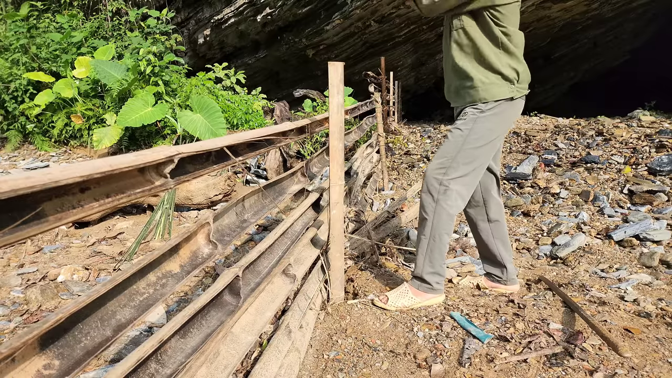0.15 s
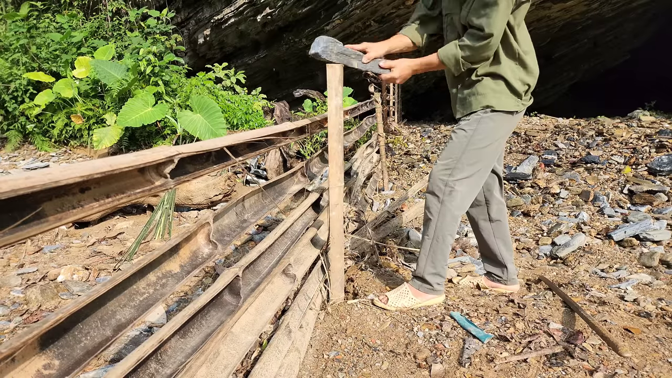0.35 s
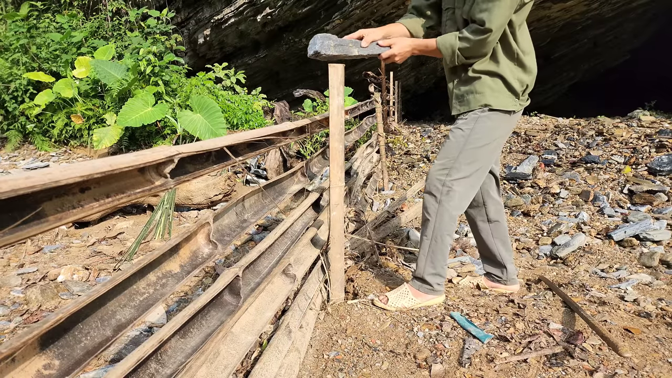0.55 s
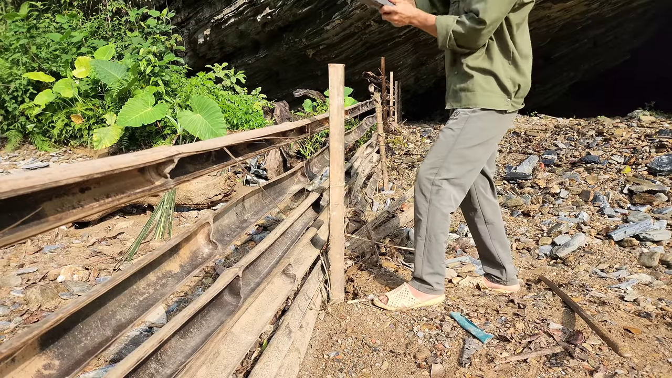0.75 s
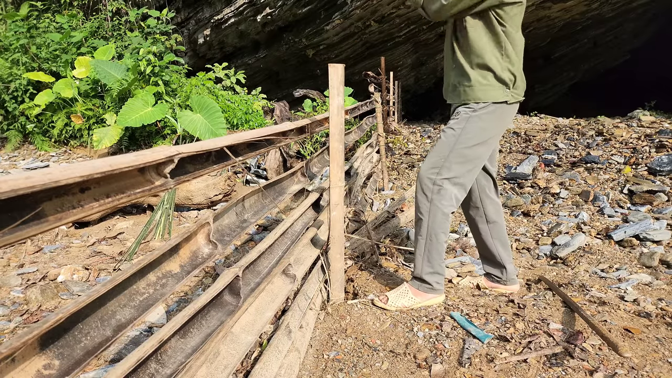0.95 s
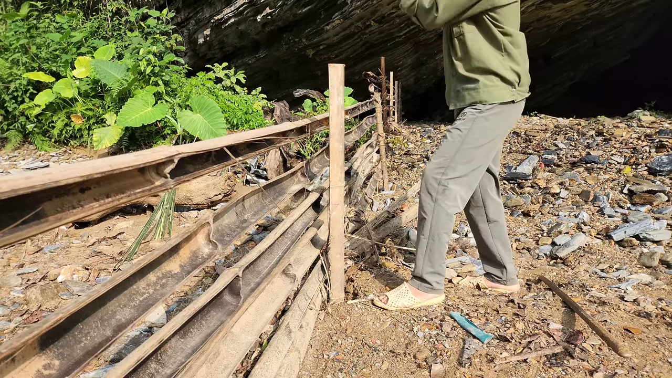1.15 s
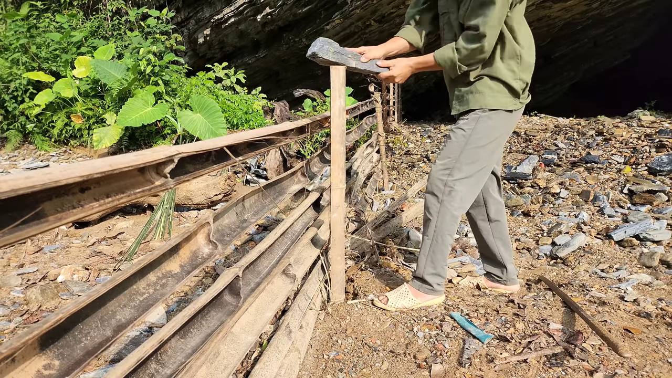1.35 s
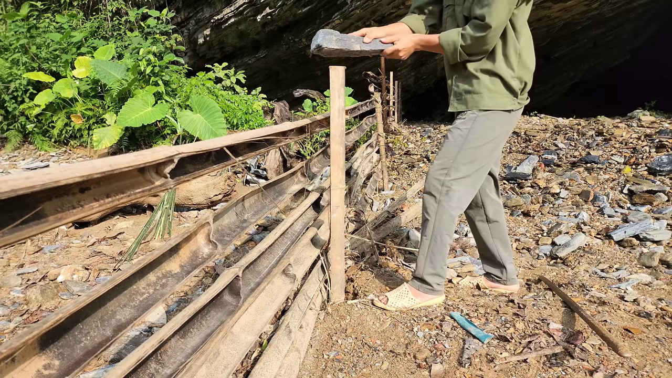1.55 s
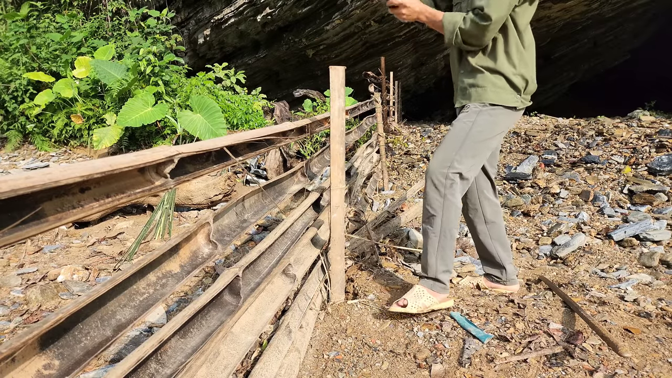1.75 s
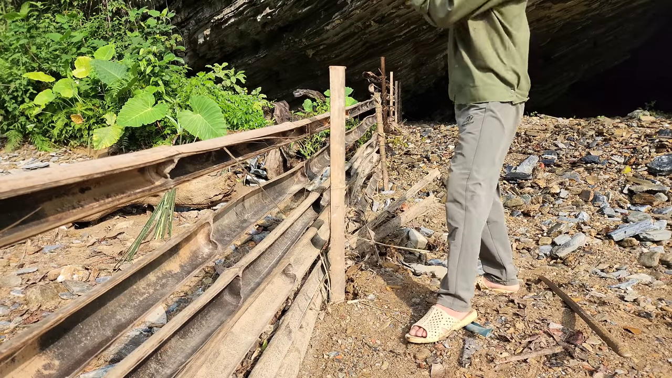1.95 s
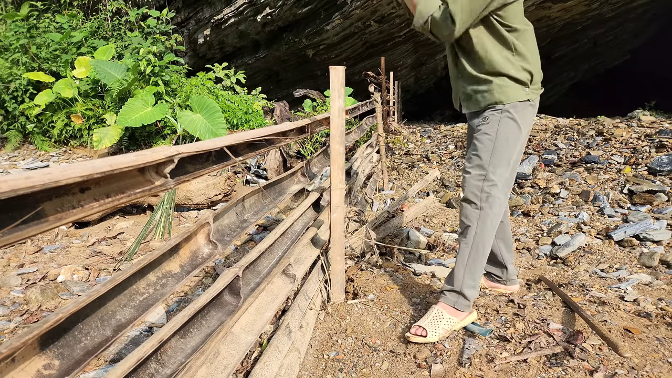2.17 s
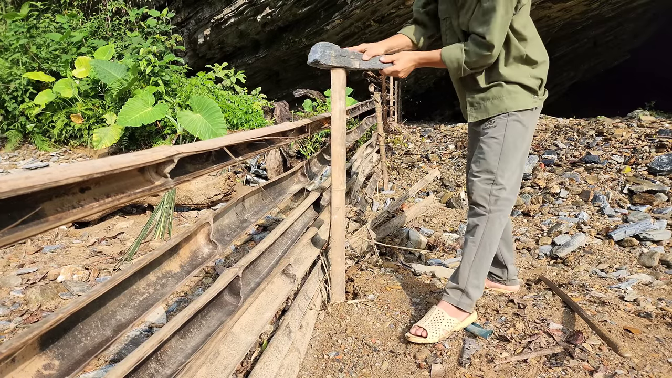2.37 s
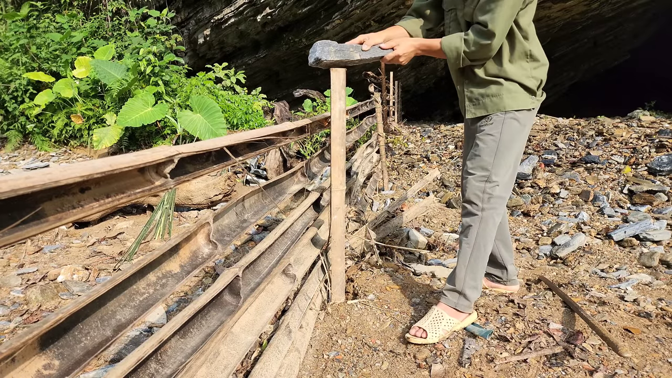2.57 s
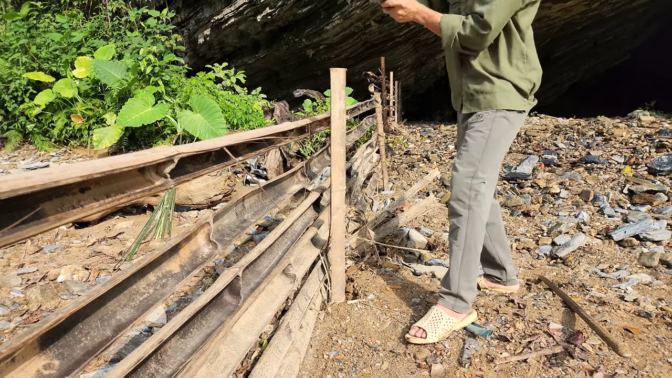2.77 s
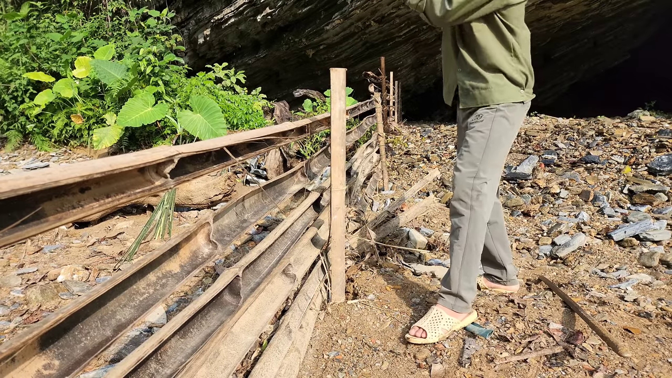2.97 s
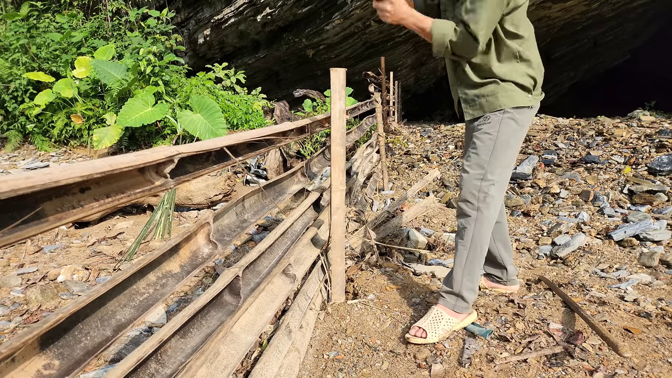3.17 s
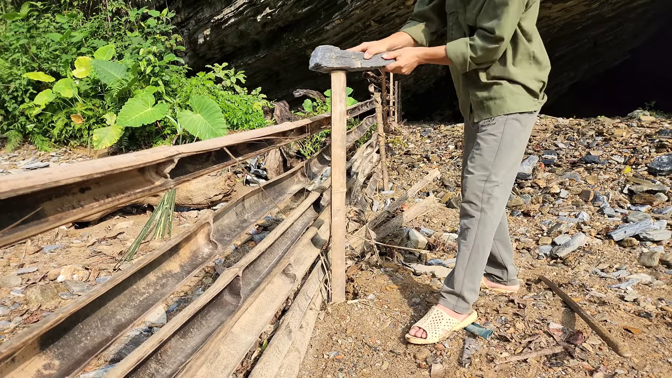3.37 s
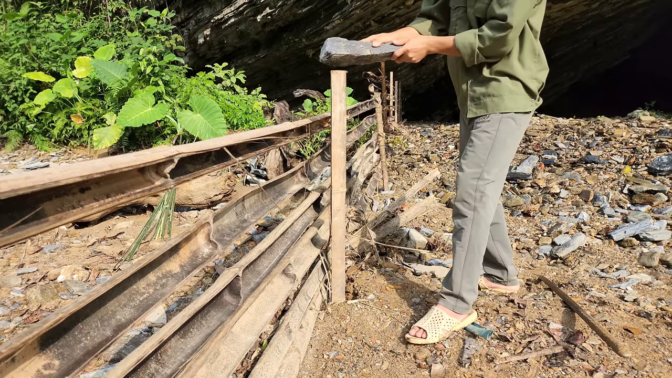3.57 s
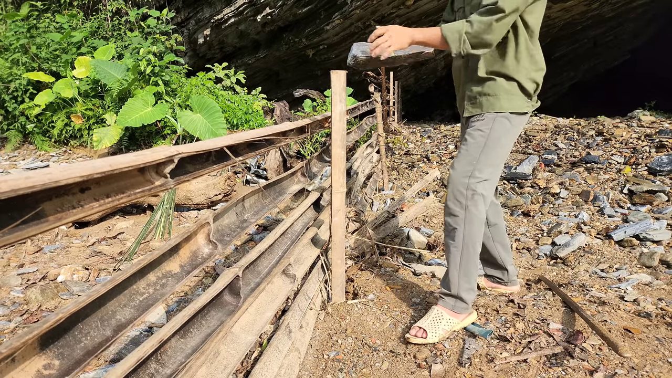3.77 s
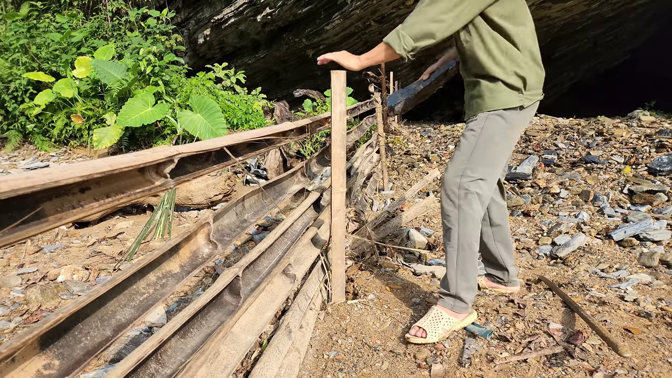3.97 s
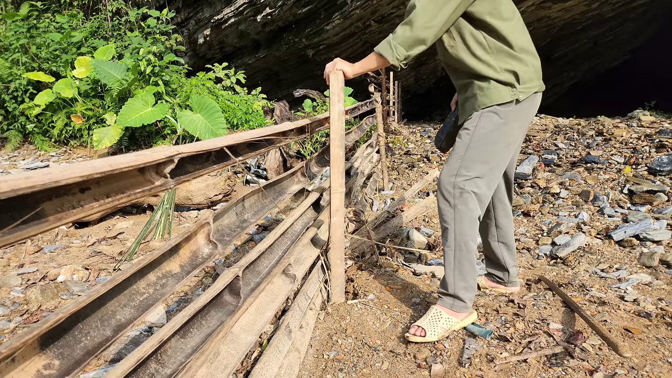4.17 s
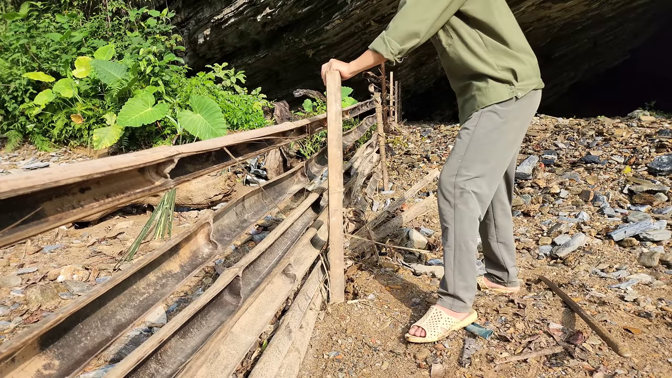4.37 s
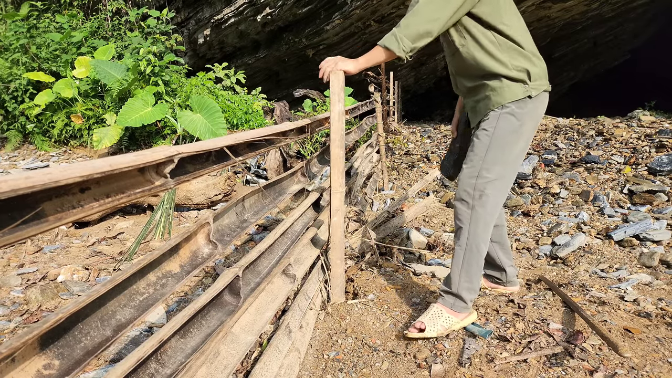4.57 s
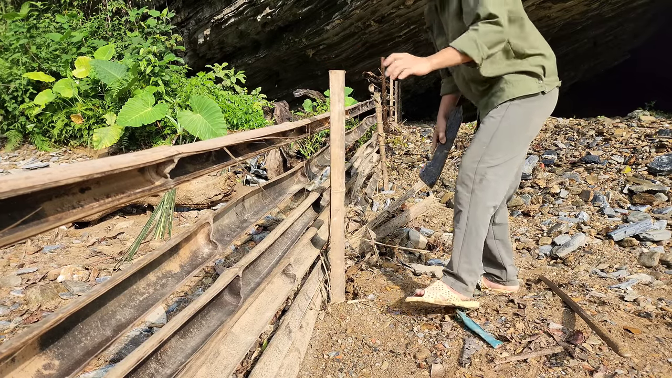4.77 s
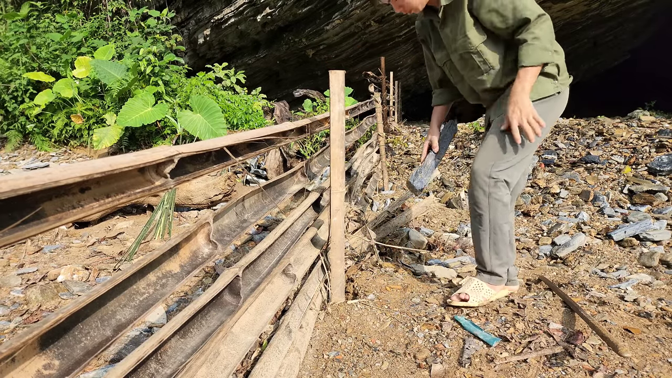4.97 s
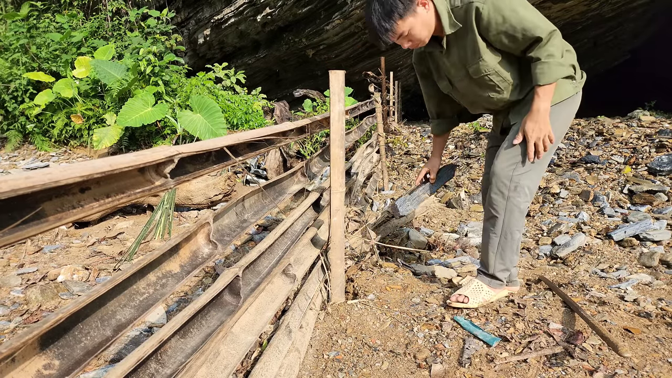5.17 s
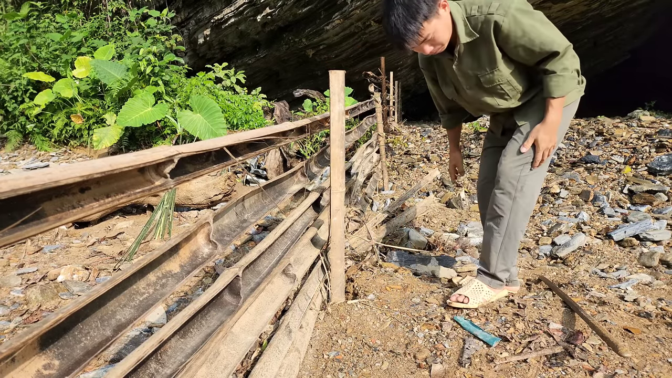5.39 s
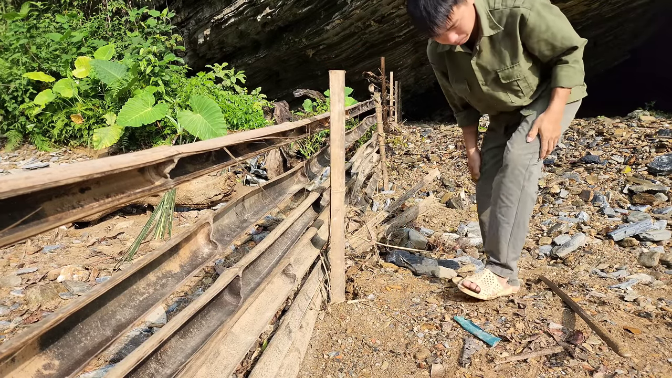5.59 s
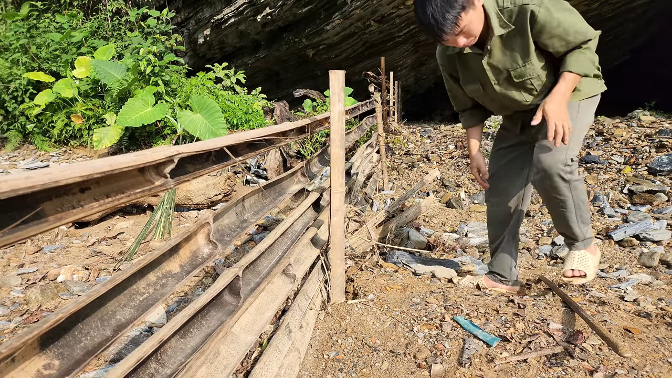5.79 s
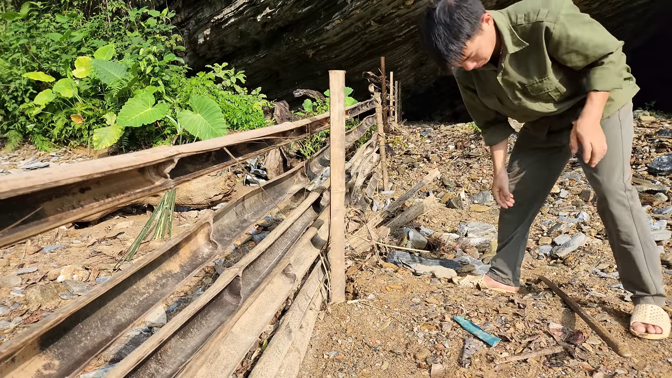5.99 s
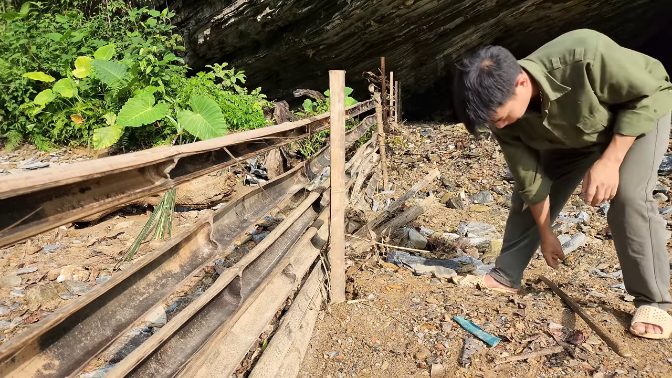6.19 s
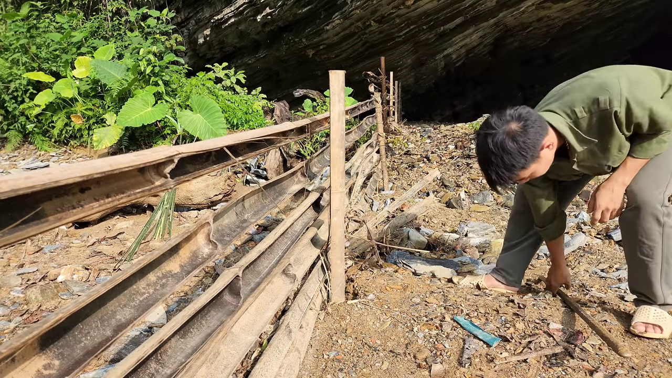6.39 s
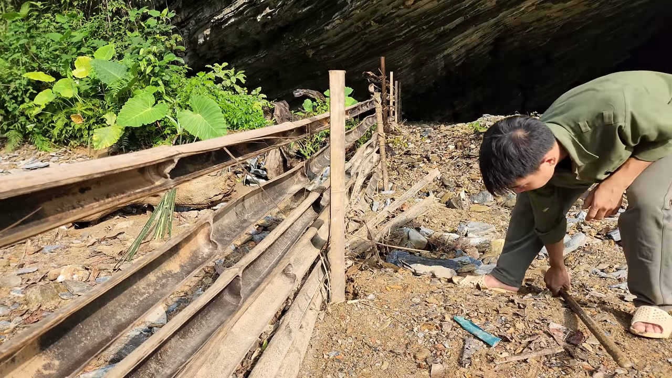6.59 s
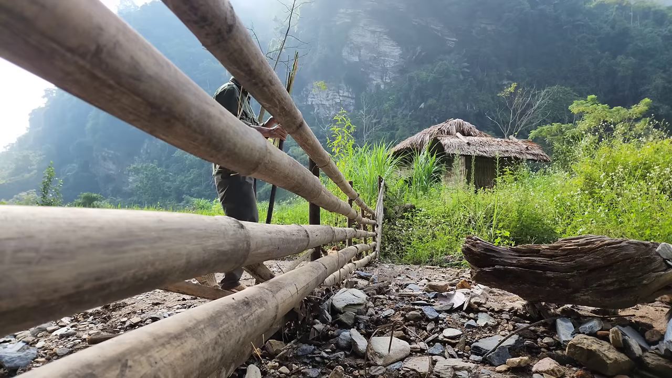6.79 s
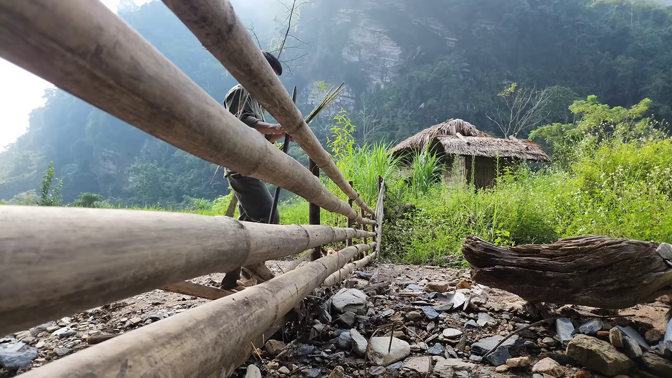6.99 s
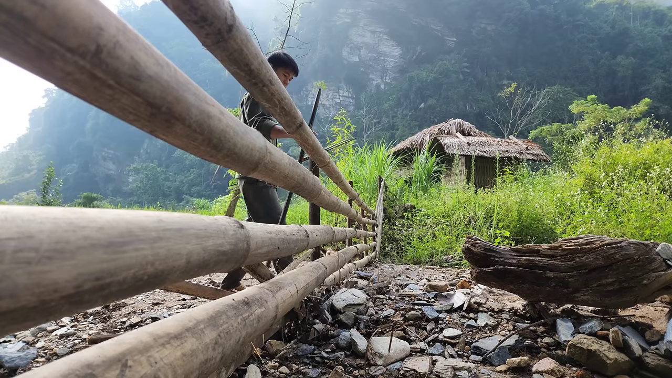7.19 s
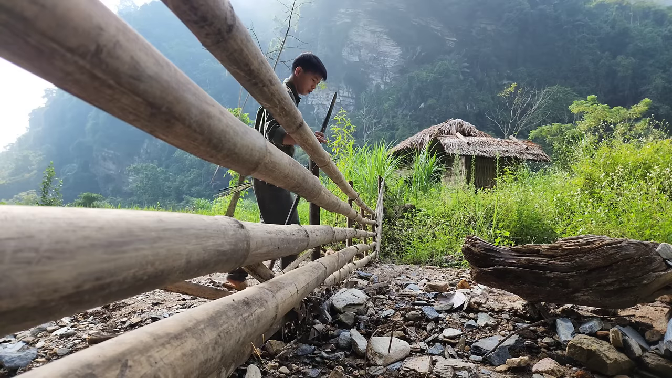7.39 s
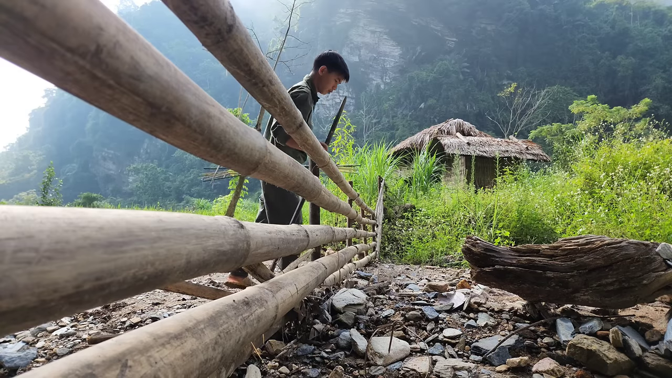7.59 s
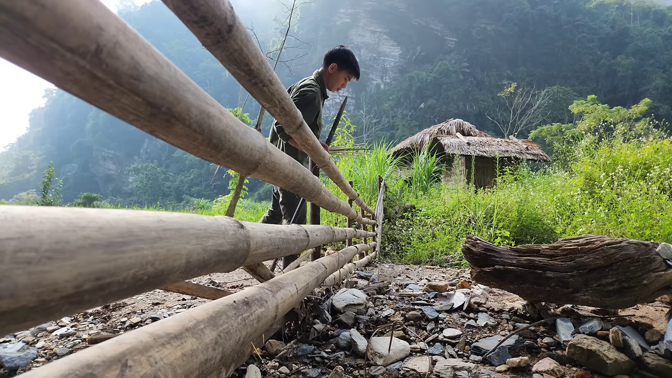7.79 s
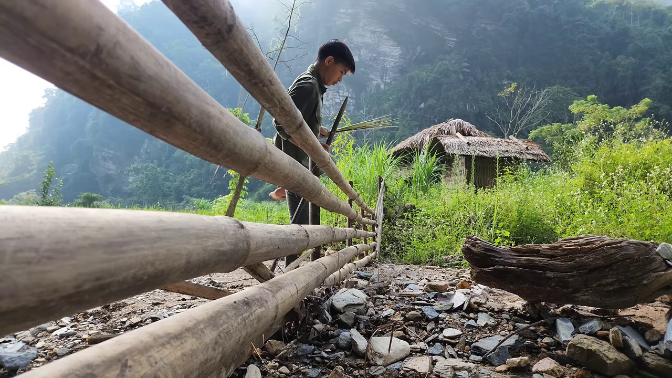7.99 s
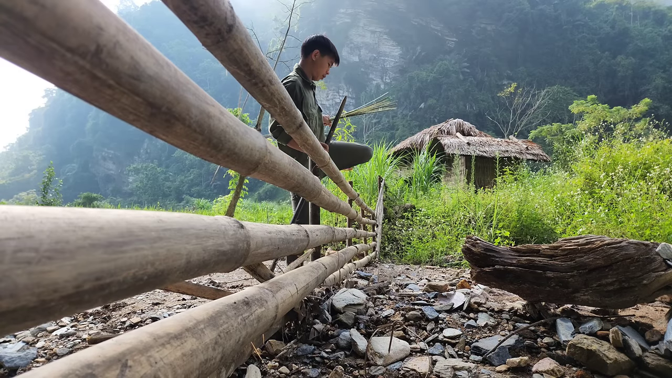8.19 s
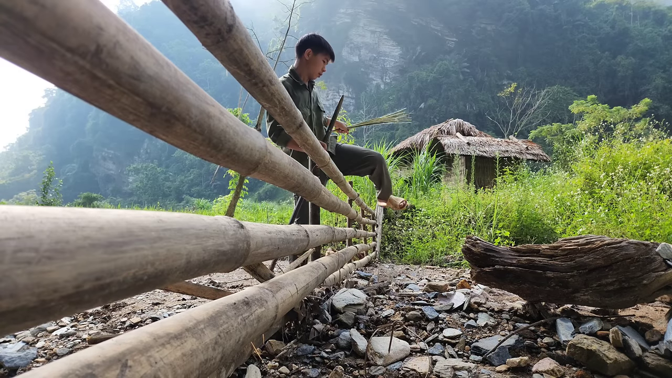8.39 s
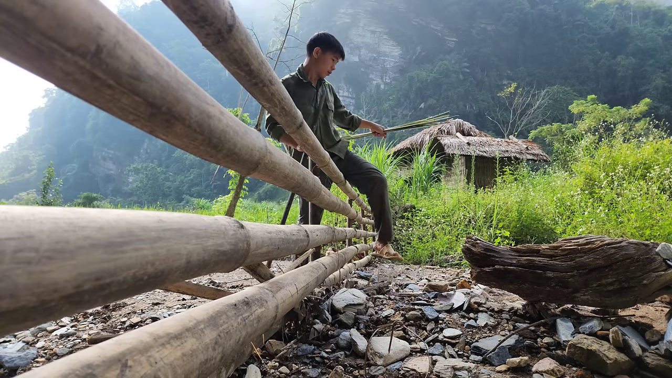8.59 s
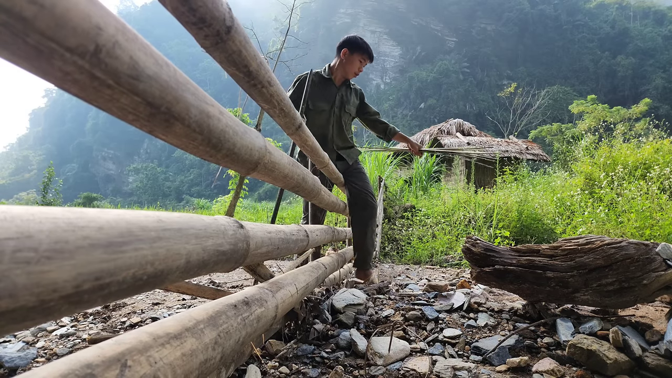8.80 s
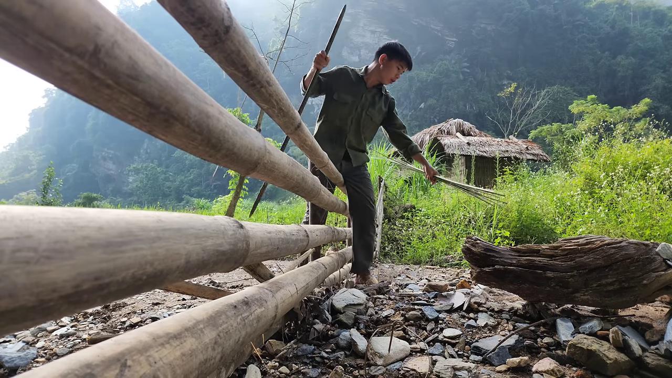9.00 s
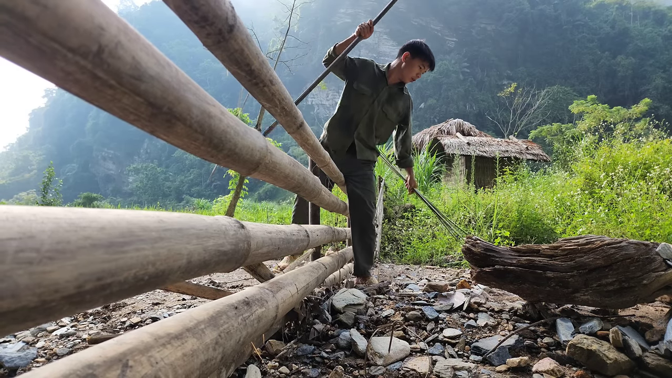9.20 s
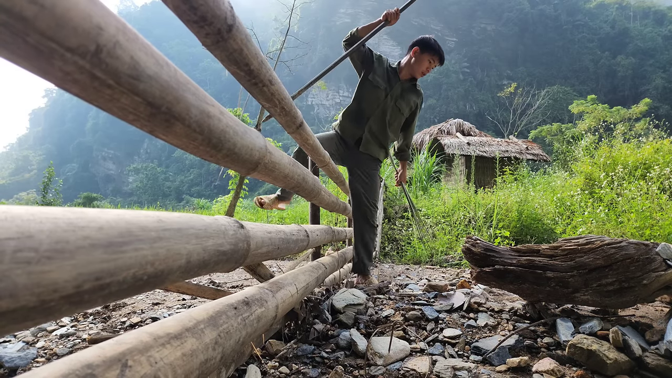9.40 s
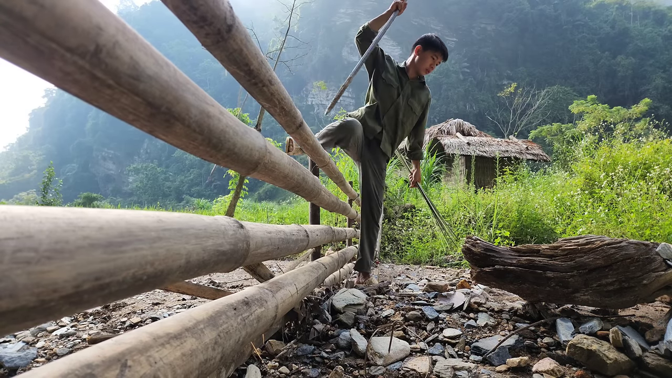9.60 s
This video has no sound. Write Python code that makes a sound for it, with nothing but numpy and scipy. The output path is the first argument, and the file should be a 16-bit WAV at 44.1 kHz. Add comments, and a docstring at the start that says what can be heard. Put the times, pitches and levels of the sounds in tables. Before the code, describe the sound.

Four hard stone blows on a wooden post echo off rock, a stone drops with a clack, then louder outdoor air and light bamboo knocks.

```python
"""Before a rock overhang, a flat stone is brought down four times on a wooden fence post; the rock throws each blow back.
Each blow is two rough contacts ringing damped wood modes; the dropped stone and iron bar ring modes of their own.
Then the listening point moves to a louder spot, with steps and light knocks on bamboo rails.
The open air is shaped noise with steady insect bands; the echo is noise whose bands die at their own speeds."""
import sys
import numpy as np
from scipy import signal
from scipy.io import wavfile
from scipy.ndimage import uniform_filter1d

SR = 44100
rng = np.random.default_rng(int(sys.argv[2]) if len(sys.argv) > 2 else 0)


def int16_out(signal):
    """Quantize to a 16-bit WAV file."""
    q = np.round(np.clip(np.atleast_2d(signal).T, -1, 1) * 32767)
    wavfile.write(sys.argv[1], SR, q.astype(np.int16))


N = 425565  # length [samples]
MOVE_S = (6.85, 6.95)  # the listening point passes from the post to the second spot [s]


def gain_of(db):
    """Amplitude factor of a level in dB."""
    return 10 ** (np.asarray(db) / 20)


def evened(x):
    """Scale to an RMS of one."""
    return x / np.sqrt(np.mean(x ** 2) + 1e-20)


def read(points, hz):
    """Read a curve between its points on a logarithmic pitch axis."""
    f, value = np.transpose(points)
    return np.interp(np.log(hz + 1), np.log(f + 1), value)


def add(mix, s, sound):
    """Lay a sound into the mix at a time in seconds, cut off at the end."""
    part = mix[..., round(s * SR):][..., :sound.shape[-1]]
    part += sound[..., :part.shape[-1]]


def ring(modes, extra_db=0, lead=0, size=SR // 3):
    """Left and right impulse response of dying modes; neighbours start in opposite directions."""
    t = np.arange(size)[:, None] / SR
    hz, db, t60 = np.transpose(modes)
    flip = np.pi * np.arange(len(hz))
    side_phase = np.array([.5, -.5])[:, None, None] * lead
    sides = np.sin(2 * np.pi * hz * t + flip + side_phase)
    swell = 1 - np.exp(-4 * hz * t)  # low modes take longer to build up
    decay = gain_of(db + extra_db - 60 * t / np.maximum(t60, .002))
    return (decay * swell * sides).sum(2)


def contact(rise_s, fall_s, rough, bright):
    """Force of a rough face landing: one sharp tap inside a short crunch whose treble differs left and right."""
    t = np.arange(SR // 20) / SR
    both, left, right = rng.standard_normal((3, len(t)))
    sides = signal.lfilter([1, -.93], [1], np.array([left, right]))
    crunch = signal.lfilter([1, -min(bright, 1)], [1], both) + 2.1 * sides
    force = rough * crunch * np.minimum(t / rise_s, 1) * np.exp(-t / fall_s)
    force[:, round(rise_s * SR)] += 1  # the tap
    return force / np.sqrt(1 + rough ** 2 * fall_s * SR)


def strike(force, body):
    """A force played into a ringing body."""
    return signal.fftconvolve(force, body, axes=1)[:, :body.shape[1]]


# Left-right likeness of the air, also used for the echo: (pitch [Hz], likeness [-1..1])
LIKENESS = [(60, 1), (180, 0.87), (550, 0.29), (1650, -0.24), (4970, 0.042), (15000, 0.11)]
# Tone of the open air at the post, relative: (pitch [Hz], level [dB])
AIR_AT_POST = [(25, -20.5), (75, -6), (150, -8.5), (340, -12), (720, -12.5), (1350, -12.5), (2000, -10),
               (3500, -14), (5800, -15), (9500, -16), (11000, -21.5), (15000, -21), (16300, -33.5)]
# Tone of the open air at the second spot, relative: (pitch [Hz], level [dB])
AIR_AT_RAILS = [(15, -39), (25, -15), (64, 9), (152, -6), (188, -9), (274, 3), (305, -3.5), (410, -2),
                (1620, -6), (2010, -4.5), (2630, -9), (7500, -10.5), (15500, -18)]
# Steady insect bands above the air at the post: (pitch [Hz], width [Hz], height [dB])
INSECT_BANDS = [(4560, 110, 6.5), (7430, 550, 4.5)]
# Air over time, relative: (time [s], high hiss level [dB], low rustle of feet and clothes level [dB])
AIR_LEVELS = [(0, -78, -80), (0.45, -72.5, -73.5), (0.9, -73, -77), (1.1, -71, -70), (1.4, -70, -72),
              (2.049, -67.5, -73), (2.3, -67, -70.5), (2.9, -71.5, -73.5), (3.4, -70.5, -73),
              (4.3, -73, -76), (5.09, -68, -69.5), (5.9, -65, -69.5), (6.131, -65, -68.5),
              (6.84, -65.5, -66.5), (6.96, -54.5, -60.5), (7.65, -56, -60.5), (8.9, -56, -61),
              (9.65, -54.5, -61.5)]
# A long faint echo tail lingers after a blow: start relative to its echo level [dB], fade [dB/s]
LINGER_DB, LINGER_DB_PER_S = -38.5, 24.5
# Gravel crunches after each clear knock: start relative to its peak level [dB], fade [dB/s]
SCUFF_DB, SCUFF_DB_PER_S = -20.5, 87


def fading_noise(t, at, start_db, fade_db_per_s):
    """Power of a noise that starts at once and fades evenly in dB."""
    return (t > at) * gain_of(2 * (start_db - fade_db_per_s * abs(t - at)))


def air():
    """Random short-time spectra with drifting patches and shared flicker; feet add a low rustle."""
    frames, hz = N // 256 + 5, np.fft.rfftfreq(1024, 1 / SR)
    a, b, c, d, patches = rng.standard_normal((frames, 513, 5)).T
    patches = evened(uniform_filter1d(uniform_filter1d(patches, 16, 0), 10, 1))
    flicker = evened(uniform_filter1d(rng.exponential(1, frames) - 1, size=2))
    t = np.arange(frames) * 256 / SR
    s, hiss_db, rustle_db = np.transpose(AIR_LEVELS)
    moved = np.interp(t, MOVE_S, [0, 1])

    # Even out each tone by its power in the rustle band and the hiss band
    bands = (hz > 150) & (hz < 1200), (hz > 2500) & (hz < 12000)
    insects = sum(db / (1 + (2 * (hz - f) / width) ** 2) for f, width, db in INSECT_BANDS)
    colours = [read(AIR_AT_POST, hz) + insects, read(AIR_AT_RAILS, hz)]
    low = 1 / (1 + (hz / 1700) ** 4)  # share of the low part at each pitch; the rest is hiss
    sums = [[10 * np.log10(np.sum(gain_of(2 * db[band]))) for band in bands] for db in colours]
    post, rails = (db - low * lo - (1 - low) * hi for db, (lo, hi) in zip(colours, sums))

    field = post[:, None] * (1 - moved) + rails[:, None] * moved
    field += (1 - low[:, None]) * np.interp(t, s, hiss_db)
    after = sum(fading_noise(t, at, echo_db + LINGER_DB, LINGER_DB_PER_S)
                for at, _, echo_db, *_ in POST_BLOWS)
    after += sum(fading_noise(t, at, db + SCUFF_DB, SCUFF_DB_PER_S) for at, db, _ in CLEAR_KNOCKS)
    low_db = 10 * np.log10(gain_of(2 * np.interp(t, s, rustle_db)) + after)
    field += low[:, None] * low_db
    field += 1.7 * patches + (.6 + 0.92 * moved) * np.minimum(flicker, 2)

    same = np.clip(read(LIKENESS, hz), -1, 1)[:, None]
    left, other = a + 1j * b, c + 1j * d
    z = np.array([left, same * left + np.sqrt(1 - same ** 2) * other])
    lean_db = np.array([1, -1])[:, None, None] * (0.1 + 0.54 * moved)  # slightly to the left
    z *= gain_of(field + 4.5 + lean_db)
    return signal.istft(z, nperseg=1024, noverlap=768)[1][:, :N]


FAINT_SPREAD_DB = 3  # how far faint knocks and ticks rise above their floor: scales a random spread


def faint(levels_db, low_hz, high_hz, count):
    """Random rows of (time [s], peak [dB], pitch [Hz]): a quarter at the post, the rest at the second spot."""
    when, size, pitch = rng.random((count, 3)).T
    late = np.sign(np.arange(count) % 4)
    s = np.where(late, MOVE_S[1] + when * (N / SR - MOVE_S[1]), when * MOVE_S[0])
    db = np.take(levels_db, late) - FAINT_SPREAD_DB * np.log(1 - .9 * size)
    return list(zip(s, db, low_hz * (high_hz / low_hz) ** pitch))


# The clearest light knocks and steps: (time [s], peak level before panning [dB], pitch [Hz])
CLEAR_KNOCKS = [(2.028, -49.5, 183), (2.738, -46.5, 159), (4.715, -52, 1376), (5.113, -49, 207),
                (5.906, -55, 159.5), (6.127, -44, 223), (6.862, -36, 157), (7.367, -39.5, 1490),
                (7.534, -34.5, 132), (7.552, -38, 156), (7.625, -35, 1330), (7.84, -35.5, 390),
                (8.057, -42, 410), (8.136, -39, 333), (8.242, -38, 209), (8.31, -41, 890),
                (8.399, -39.5, 380), (8.472, -39, 458), (8.693, -40, 181), (8.992, -35.5, 1360),
                (9.112, -41, 265), (9.132, -41, 931), (9.424, -39.5, 970)]
# The clearest ticks of grit and twigs: (time [s], peak level before panning [dB], pitch [Hz])
CLEAR_TICKS = [(0.9592, -54, 4310), (2.068, -50, 3320), (4.2145, -50, 4060), (4.7906, -41, 3110),
               (6.118, -39, 4080), (6.5926, -48.5, 4800), (7.1227, -34.5, 7590), (7.1516, -34, 7800),
               (7.5228, -38, 8050), (7.7757, -34, 7600), (7.9791, -36, 5720), (8.1254, -41, 3420),
               (9.0897, -36, 6740), (9.3707, -32.5, 7440), (9.4988, -44, 2950)]
# Lowest peaks of the random faint ones [dB]: (at the post, at the second spot)
FAINT_KNOCK_DB, FAINT_TICK_DB = (-61, -48), (-64.5, -45.5)
RAILS_PAN_DB = 5.5  # left over right: at the second spot the walker is to the left


def knocks():
    """Each knock is a crunch through a damped ring with overtones; each tick is a broad snap."""
    out, side = np.zeros((2, N)), np.array([[.5], [-.5]]) * RAILS_PAN_DB
    for s, db, hz in CLEAR_KNOCKS + faint(FAINT_KNOCK_DB, 100, 1500, count=40):
        t60 = 0.036 * (300 / hz) ** 0.48  # low knocks ring longer
        tones = [(hz, 0, t60), (1.97 * hz, -4, 0.62 * t60), (3.03 * hz, -6, 0.6 * t60)]
        clatter = [(800, 0, .006), (1700, 1, .005), (2900, 0, .004)]
        body = ring(tones + clatter, size=SR // 10)
        knock = strike(contact(rise_s=0.0006, fall_s=0.003, rough=0.09, bright=0.3), body)
        add(out, s, gain_of(db + side * (s > MOVE_S[1])) * knock / abs(knock).max())
    for s, db, hz in CLEAR_TICKS + faint(FAINT_TICK_DB, 2700, 9500, count=80):
        body = ring([(hz, 0, .003), (0.5 * hz, -5, .002), (0.85 * hz, -6, .002)], size=SR // 20)
        tick = strike(contact(rise_s=0.0003, fall_s=0.0034, rough=0.81, bright=0.38), body)
        add(out, s, gain_of(db + side * (s > MOVE_S[1])) * tick / abs(tick).max())
    return out


# The iron bar touches stone: (time [s], strength [dB])
BAR_TAPS = [(6.855, -41), (6.861, -41), (6.899, -44)]
# Modes of the iron bar: (pitch [Hz], level [dB], t60 [s])
BAR_MODES = [(930, -3, 0.0056), (3700, 16.5, 0.0025), (925, -5, 0.089), (1270, -8, 0.3), (2170, -8.5, 0.31),
             (2590, -15, 0.37), (3740, -5.5, 0.18), (4350, -9, 0.1), (5000, -10, 0.021)]


def bar():
    """Taps of iron on stone: short rough contacts ring the modes of the bar."""
    out = np.zeros((2, N))
    for s, db in BAR_TAPS:
        force = contact(rise_s=0.00028, fall_s=0.0023, rough=0.3, bright=0.51)
        add(out, s, gain_of(db) * strike(force, ring(BAR_MODES)))
    return out


# Decay of the overhang's echo: (pitch [Hz], t60 [s])
ECHO_DECAY = [(60, .65), (200, 0.34), (600, .42), (2000, .45), (5000, 0.36), (12000, 0.095)]
ECHO_GRAIN_DB = 3  # separate rock faces make the echo uneven


def overhang(colour):
    """Dense reflections: strong early scatter from fence and ground, then the rock; each band dies at its own speed."""
    hz, t, z = signal.stft(rng.standard_normal((3, SR)), SR, nperseg=1024, noverlap=768)
    same = np.clip(read(LIKENESS, hz), 0, 1)[:, None]
    z = np.sqrt(same) * z[0] + np.sqrt(1 - same) * z[1:]
    grain = evened(uniform_filter1d(rng.standard_normal(z[0].shape), size=24, axis=0))
    fade_db = 60 * t / read(ECHO_DECAY, hz)[:, None]
    z *= gain_of(ECHO_GRAIN_DB * grain + read(colour, hz)[:, None] - fade_db)
    tail = signal.istft(z, SR, nperseg=1024, noverlap=768)[1][:, :SR // 2]
    t = np.arange(SR // 2) / SR
    near = 1.8 * np.clip(t / 0.0065, 0, 1) * np.exp(-t / 0.024)
    bump = 1 + 0.047 * np.exp(-((t - .056) / 0.002) ** 2)  # a barely raised moment in the rock's answer
    rock = np.clip((t - .034) / .01, 0, 1) * bump
    return evened(tail) * (near + rock) * gain_of(-11.5)


# The dropped stone lands and bounces: (time [s], level [dB], dull thud [dB], ring [dB], echo [dB],
# tilt of ring and echo [dB per octave]); thud, ring and echo are relative to the level
STONE_DROPS = [(5.4470, -20.5, -5, -3.5, -17.5, -2.5), (5.5010, -14, -15.5, 2.5, -19, 2.5)]
# Modes of the stone: (pitch [Hz], level [dB], t60 [s])
STONE_MODES = [(430, -43, 0.0291), (804, -9.5, 0.027), (1210, -3.5, 0.026), (1847, 4.5, 0.018),
               (2590, -3.5, 0.013), (3350, 0, 0.0041), (4060, -14, 0.011), (5500, -12, 0.0046),
               (7800, -16, 0.013), (9040, -17.5, 0.0054), (14000, -21, 0.0028)]
# Tone of the overhang's answer to the dropped stone, relative: (pitch [Hz], level [dB])
STONE_ECHO_TONE = [(25, -13), (90, 9), (170, 3.5), (700, 1), (1700, -2.5), (1880, 8), (2080, -8.5),
                   (4500, -8.5), (6000, -18), (14600, -17), (16300, -40)]


def drops():
    """A dull push into the soil and the ringing clack of the stone, off to the right, with its echo."""
    out, hz = np.zeros((2, N)), np.array(STONE_MODES)[:, 0]
    for s, db, thud_db, ring_db, echo_db, tilt_db in STONE_DROPS:
        thud = -ring([(154, 0.0, 0.054), (364, 17.0, 0.0081), (810, 5.5, 0.022)])
        body = ring(STONE_MODES, tilt_db * np.log2(hz / 1850), -1.1 * np.minimum(hz / 1500, 1))
        clack = strike(contact(rise_s=.0008, fall_s=0.0021, rough=0.36, bright=0.2), body)
        to_right_db = np.array([[-1.5], [1.5]])
        add(out, s, gain_of(db + thud_db) * thud + gain_of(db + ring_db + to_right_db) * clack)
        colour = [(f, v + tilt_db * np.log2(f / 500)) for f, v in STONE_ECHO_TONE]
        add(out, s, gain_of(db + echo_db) * overhang(colour))
    return out


# Blows on the post: (time [s], strength [dB], echo [dB], second contact relative to the first [dB],
# landing off centre [-1..1], low thump [dB], hardness [dB per octave],
# pitch of the post [ratio]: the stone's weight and grip detune it)
POST_BLOWS = [(0.4789, -5.5, -29.5, -7.5, 0.99, -2.5, 1.5, 1.017),
              (1.4475, -11.5, -28, 5.5, 0.38, 8, -1.5, 1.02),
              (2.431, -10, -25.5, 3.5, -.9, -7.5, -0.5, .995), (3.3828, -10, -28, 5, -0.92, -1.5, 1, 1.008)]
# Modes of the wooden post: (pitch before detuning [Hz], level [dB], t60 [s])
POST_MODES = [(156, -11.5, 0.06), (262, -13, 0.022), (396, -17.5, 0.043), (551, -7.5, 0.044),
              (673, -12, 0.026), (831, -4.5, 0.045), (942, -10, 0.061), (1293, 1, 0.037),
              (1572, -7.5, 0.043), (1820, -8, 0.025), (2174, -6, .015), (2593, -9.5, 0.023),
              (3035, -10, 0.02), (3480, -12.5, 0.021), (3950, -11, 0.025), (4630, -10.5, 0.026),
              (5340, -14.5, 0.015), (6700, -27, 0.028), (7470, -17.5, 0.0096), (9980, -29, 0.048),
              (12700, -35, .006)]
# Post and fence send each mode out in lobes: (pitch [Hz], phase lead of left over right [rad])
POST_LOBES = [(700, 0), (950, .3), (1300, .9), (1500, 1.8), (1900, -.8), (3000, -.5), (6000, 1.2),
              (12000, 1.6)]
# Landing off centre feeds some modes and starves others: (pitch [Hz], change at the far edge [dB])
EDGE_LANDING = [(270, 1), (410, 6.5), (570, -8), (820, -0.9), (1300, -0.1), (1560, 1.05), (2500, 0.5),
                (3600, -0.5), (4700, 4)]
# The soil thumps under the post: (pitch [Hz], level [dB], t60 [s])
SOIL_MODES = [(65, 0.5, .3), (98.5, -3.5, .15)]
# Tone of the overhang's answer to a blow, relative, before thump: (pitch [Hz], level [dB])
BLOW_ECHO_TONE = [(25, -11.5), (70, 1.5), (176, -11.5), (264, -7.5), (420, -3.5), (620, -8), (830, -3),
                  (1050, -9.5), (1400, -4.5), (1700, -10), (2000, -7.5), (3200, -16.5), (5000, -23.5),
                  (8000, -21.5), (12800, -30), (15000, -34.5), (16300, -60)]
SECOND_S = .0027  # the far edge of the stone lands this much later
FIRST_HZ = 2520  # the first contact crushes soft end grain and is duller above this
GROUND_DB = -39  # soil relative to the blow, before each blow's own thump


def blows():
    """The stone lands in two contacts that ring the post, too thin to send out bass; the overhang answers."""
    out, hz = np.zeros((2, N)), np.array(POST_MODES)[:, 0]
    thin = signal.butter(2, 110, "high", fs=SR, output="sos")
    dull = signal.butter(1, FIRST_HZ, fs=SR)
    back = round(SECOND_S * SR)
    for s, db, echo_db, second_db, off, thump_db, hard_db, tune in POST_BLOWS:
        first = contact(rise_s=0.00073, fall_s=0.0091, rough=0.018, bright=0.66)
        second = gain_of(second_db) * np.pad(first, ((0, 0), (back, 0)))[:, :-back]
        force = signal.lfilter(*dull, first) + second
        spot_db = off * read(EDGE_LANDING, hz) + hard_db * np.log2(hz / 1300)
        body = ring(np.array(POST_MODES) * [tune, 1, 1], spot_db, read(POST_LOBES, hz))
        to_right_db = np.array([[-.4], [.4]])
        add(out, s, gain_of(db + to_right_db) * signal.sosfilt(thin, strike(force, body)))

        # The bare crack of stone on end grain
        grain = ring([(1890, 6, .004), (3600, 4, 0.0028), (6200, 1, .002), (11100, -7.5, 0.0022)])
        add(out, s, gain_of(db - 11.5) * strike(first + second, grain))
        add(out, s, gain_of(db + GROUND_DB + thump_db) * ring(SOIL_MODES))
        # A stronger thump also gives the echo more bass
        colour = [(f, v + 1.4 * thump_db / (1 + (f / 300) ** 2)) for f, v in BLOW_ECHO_TONE]
        add(out, s, gain_of(echo_db) * overhang(colour))
    return out


def scene():
    """All sources, already placed left and right."""
    return air() + knocks() + bar() + drops() + blows()


def record(dry):
    """The microphone drops the deepest bass; peaks are softly limited; then the top is cut at 16.1 kHz."""
    heard = signal.sosfilt(signal.butter(2, 40, "high", fs=SR, output="sos"), dry)
    limited = heard / (1 + abs(heard / .97) ** 4) ** .25
    top_cut = signal.firwin(511, 16100, window=("kaiser", 9), fs=SR)
    return signal.oaconvolve(limited, top_cut[None], "same")


dry = scene()
out = record(dry)
int16_out(out)
```